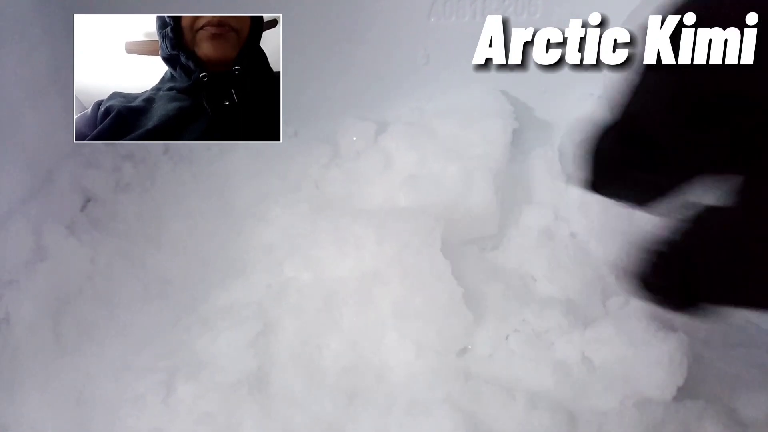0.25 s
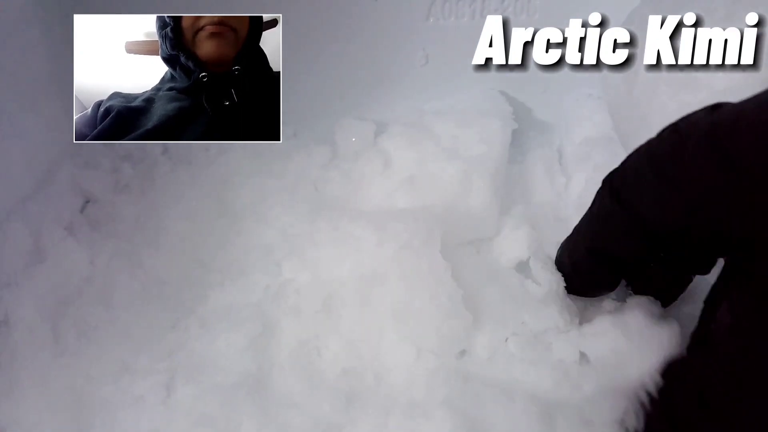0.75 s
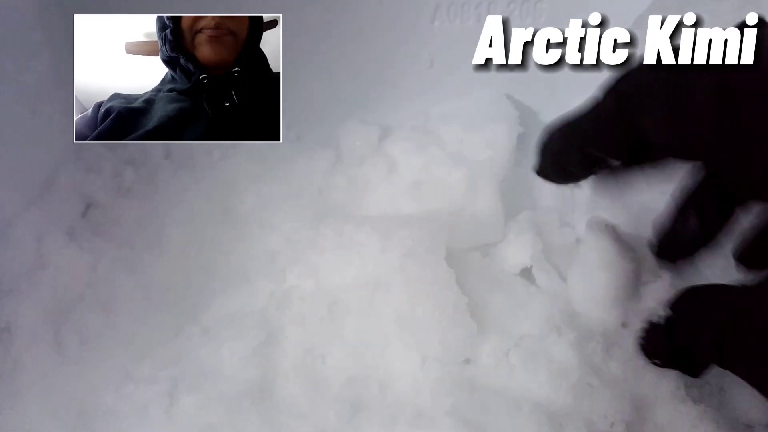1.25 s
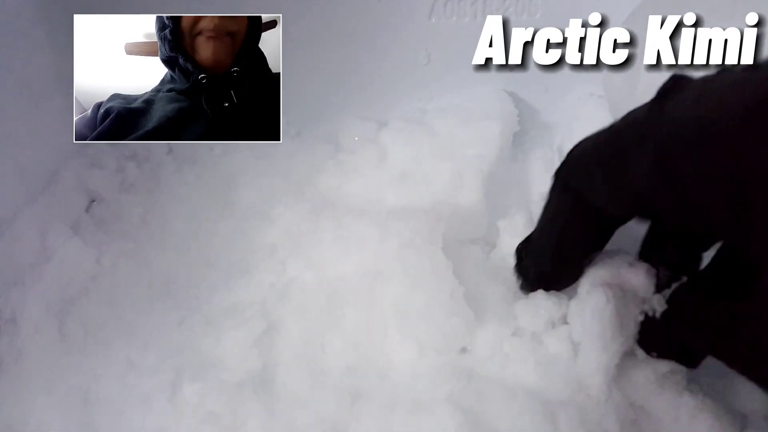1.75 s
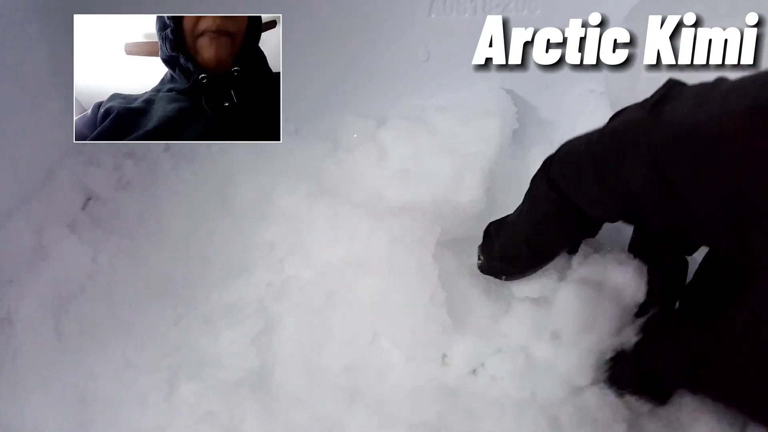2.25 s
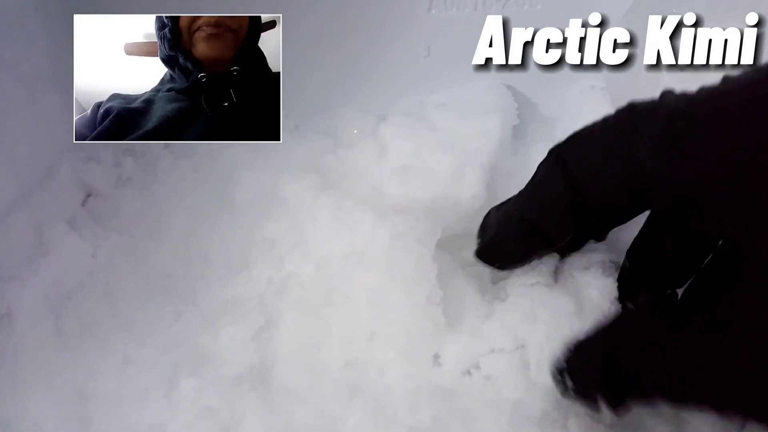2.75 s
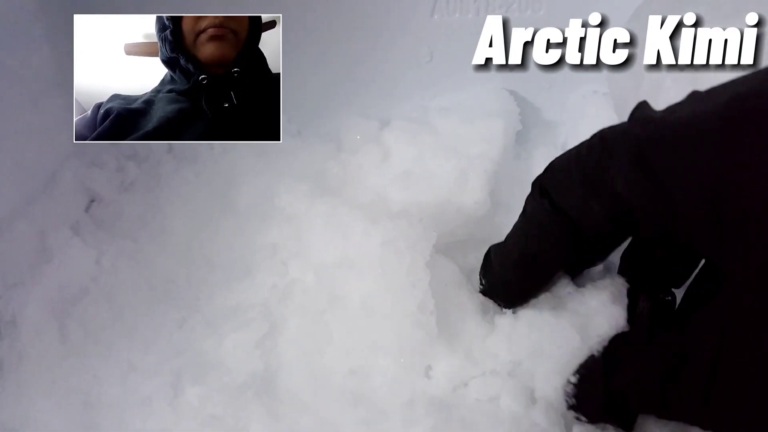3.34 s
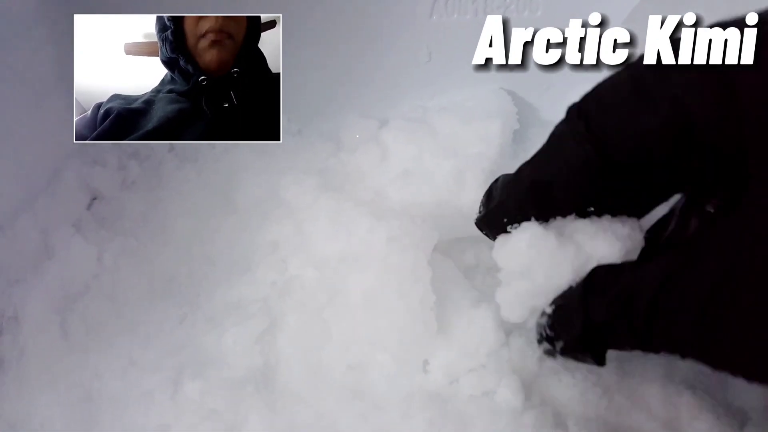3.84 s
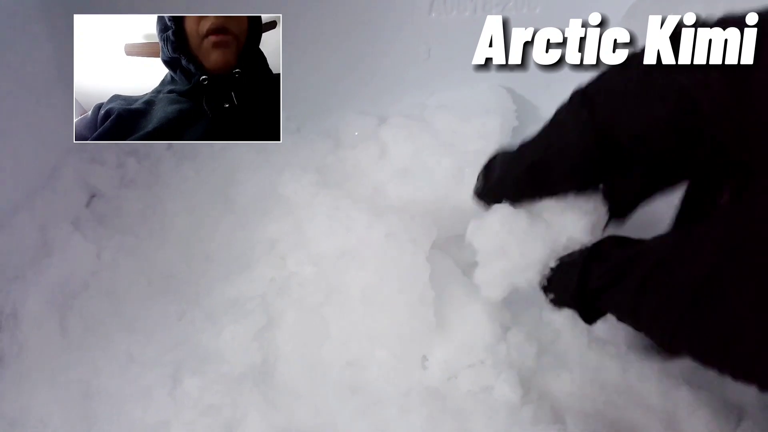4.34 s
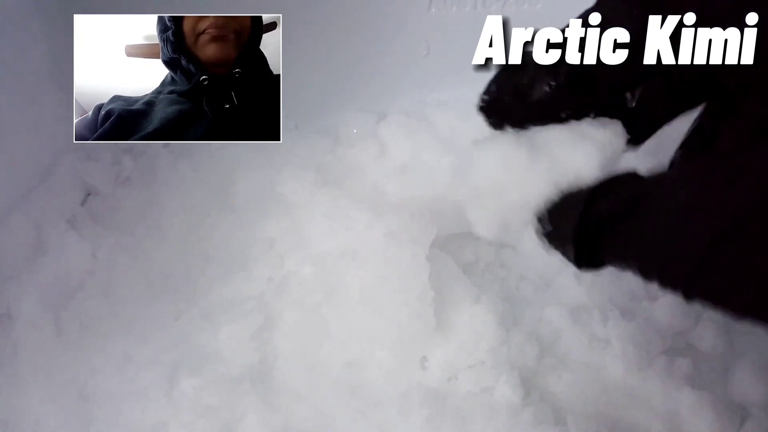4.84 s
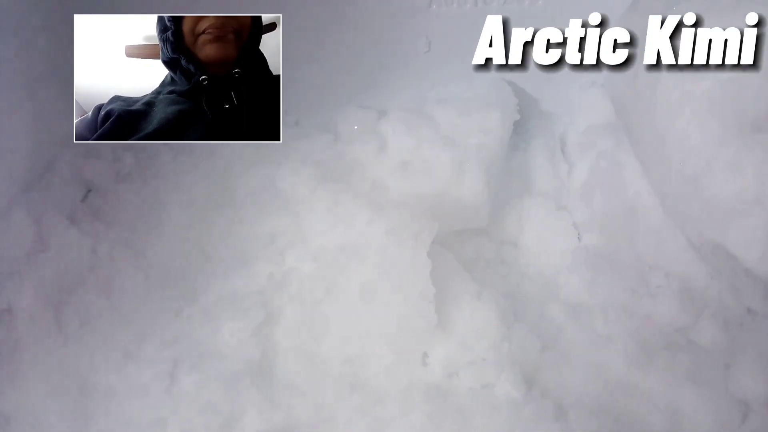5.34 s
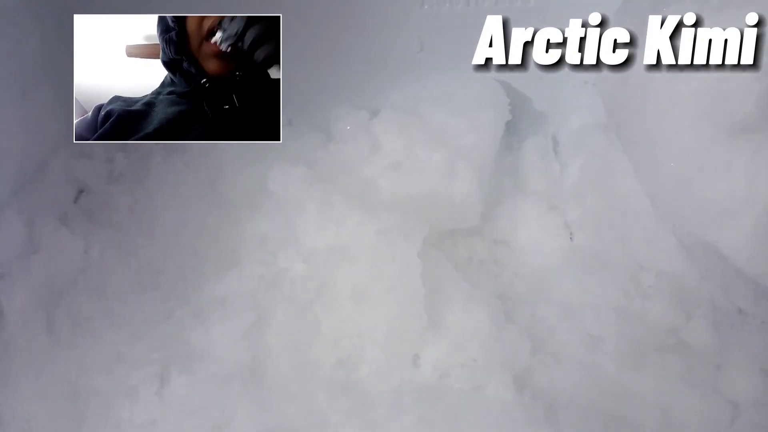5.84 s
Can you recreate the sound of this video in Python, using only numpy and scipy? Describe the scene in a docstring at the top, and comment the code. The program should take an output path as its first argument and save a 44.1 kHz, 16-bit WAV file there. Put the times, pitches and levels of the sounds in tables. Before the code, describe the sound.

A freezer compressor drones steadily, a low hum near 60 Hz with faint higher whine and rushing air, heard from inside the boxy cabinet by a close stereo microphone. A knock opens at 0 s; at about 0.25 s sharp bright snaps and a powder hiss follow, with small squeaky rubs. From 0.5 to 1.2 s gloved fingers rake packed frost in dense crunches with booming thuds. Stronger strokes come around 1.4 and 2.1 s, with crackles and spills between; crisp snaps hit near 2.7 s, and more crunching lasts until 3.7 s. Then only short powdery spills and light crumbs until 4.3 s. Muffled knocks and small cracks cluster at 4.6 s. Around 5.1 to 5.3 s, knocks and a hard crunch lead to a lump tearing free, its tone sliding down into a low thud. A deep bump at 5.6 s and soft knocks with faint rustles near 5.9 s close over the hum.

```python
"""Inside a freezer, gloved fingers rake and scoop powdery frost while the compressor drones.
The drone is a set of sine tones over rushing noise. Random tiny fractures become thuds in the cabinet,
crunch in packed frost and hiss in loose powder. Snaps and rubs are short noise bursts that ring;
knocks are soft pushes on the cabinet, and one torn lump is a falling tone.
A close stereo microphone feeds a limiter, so the drone ducks under loud strokes."""
import sys
import numpy as np
from scipy import signal
from scipy.fft import rfft, irfft
from scipy.io import wavfile
from scipy.ndimage import uniform_filter1d

SR = 44100
rng = np.random.default_rng(int(sys.argv[2]) if len(sys.argv) > 2 else 0)


def pcm_store(signal):
    """Save signal as 16-bit PCM."""
    levels = np.round(np.clip(np.atleast_2d(signal), -1, 1) * 32767)
    wavfile.write(sys.argv[1], SR, levels.astype(np.int16).T)


N = 268569   # length in samples


def from_db(db):
    """Turn decibels into gain."""
    return 10 ** (np.asarray(db) / 20)


def rms_one(x):
    """Scale a sound to an average (rms) level of 1."""
    return x / np.sqrt(np.mean(x ** 2) + 1e-20)


def drift(rate_hz):
    """Random wander of spread 1; a lower rate makes it slower and smoother."""
    r = np.exp(-2 * np.pi * rate_hz / SR)
    noise = rng.standard_normal(N + SR)
    wander = signal.lfilter([1], [1, -2 * r, r * r], noise)
    return rms_one(wander[SR:])   # skip the first second, while the filter settles


def resonate(x, hz, width_hz):
    """Let a sound ring at one pitch (two-pole resonance, gain 1 at its peak)."""
    r = np.exp(-np.pi * width_hz / SR)
    feedback = [1, -2 * r * np.cos(2 * np.pi * hz / SR), r * r]
    return signal.lfilter([(1 - r * r) / 2, 0, (r * r - 1) / 2], feedback, x)


def shape(x, points, to_gain=from_db):
    """Colour a sound with a minimum-phase filter, which never acts before its input arrives."""
    hz, value = np.transpose(points)
    grid_hz = np.fft.rfftfreq(4096, 1 / SR) + 1   # +1 avoids the logarithm of zero
    gain = to_gain(np.interp(np.log(grid_hz), np.log(hz), value))
    # Folding the cepstrum (the spectrum of the log gain) forward in time gives minimum phase.
    cepstrum = irfft(np.log(gain + 1e-6))
    cepstrum[1:2048] *= 2
    cepstrum[2049:] = 0
    response = irfft(np.exp(rfft(cepstrum)))
    return signal.fftconvolve(np.atleast_2d(x), response[None], axes=1)[:, :N]


# How alike left and right are: pitch_hz, likeness (1 = the same, 0 = unrelated)
LEFT_RIGHT_LIKENESS = [(180, 1), (350, 0.97), (600, 0.1), (3000, 0.12), (15000, 0.035)]
# Balance between the sides: pitch_hz, left_over_right_db
SIDE_BALANCE = [(150, 2.5), (900, -0.5), (2500, 4), (5000, 1.5), (8000, 2.5), (15000, 6.5)]


def stereo(common, apart):
    """Mix two unrelated signals so the channels agree in the bass and part in the treble."""
    mid = shape(common, LEFT_RIGHT_LIKENESS, lambda c: np.sqrt(1 + np.clip(c, -.99, .99)))
    side = shape(apart, LEFT_RIGHT_LIKENESS, lambda c: np.sqrt(1 - np.clip(c, -.99, .99)))
    left = shape((mid + side)[0], SIDE_BALANCE, lambda db: from_db(db / 2))
    right = shape((mid - side)[0], SIDE_BALANCE, lambda db: from_db(-db / 2))
    return np.vstack([left, right])


SHAFT_HZ = 58.75   # turns per second
RUSH_DB = -20   # average level, before its slow wander
# Drone tones: multiple of shaft speed, level_db (rms, before panning and wavering)
DRONE_TONES = [(1, -21.5), (2, -32), (3, -28.5), (5, -30), (6, -36.5), (10, -37.5), (13, -26.5), (14, -34),
               (15, -37.5), (17, -40), (36, -44), (48, -42), (49, -37.5), (51, -38), (52, -40)]
# Where each tone sits: pitch_hz, left_over_right_db, left_lead_rad
DRONE_PLACES = [(60, 3.5, 0.29), (790, -2, 0.8), (1120, 26, 2.2), (3000, 1, 0.48)]
# Colour of the machine's broad rush: pitch_hz, level_db (per Hz, relative)
RUSH_COLOUR = [(40, -21), (176, -4.5), (290, -21), (490, -26), (770, -22.5), (2600, -30), (2980, -21.5),
               (3400, -34.5), (6000, -40), (16000, -42)]


def compressor():
    """Shaft multiples form a drone that wavers a little, over a rush of noise."""
    turn = 2 * np.pi * SHAFT_HZ * np.arange(N) / SR
    half = np.array([[.5], [-.5]])   # share the differences between left and right
    place_hz, pans_db, leads_rad = np.transpose(DRONE_PLACES)
    drone = 0
    for multiple, level_db in DRONE_TONES:
        hz = multiple * SHAFT_HZ
        pan_db = np.interp(hz, place_hz, pans_db)
        lead_rad = np.interp(hz, place_hz, leads_rad)
        # Starting points cover only part of a cycle: loosely in step, a throb each turn.
        start_rad = 3.52 * rng.random()
        tone = np.sin(multiple * turn + lead_rad * half + start_rad)
        drone = drone + np.sqrt(2) * from_db(level_db + pan_db * half) * tone
    rush = rms_one(shape(stereo(*rng.standard_normal((2, N))), RUSH_COLOUR))
    wavering_drone = drone * from_db(0.78 * drift(13))
    return wavering_drone + from_db(RUSH_DB + 0.64 * drift(5.3)) * rush


# Booming notes of the freezer's air and walls: pitch_hz, width_hz, level_db (relative)
CABINET_NOTES = [(130.5, 33, -7), (159.3, 21, -1), (191.1, 16, 6.5), (294, 137, -5.5), (376.3, 55, 1.5),
                 (510, 66, -5)]


def cabinet(x):
    """Air and walls of the freezer boom on a few low resonances."""
    boom = 0
    for k, (hz, width_hz, level_db) in enumerate(CABINET_NOTES):
        boom = boom + (-1) ** k * from_db(level_db) * resonate(x, hz, width_hz)   # signs alternate
    return boom


# A lump tearing free: start_s, level_db (once the slide is over), from_hz, to_hz,
# slide_s (time constant), length_s
LUMP_SLUMP = (5.264, 4.9, 1100, 160, 0.029, 0.16)


def slump():
    """A torn lump's tone slides down to a low note, ragged and weak during the slide."""
    start_s, level_db, from_hz, to_hz, slide_s, length_s = LUMP_SLUMP
    t = np.maximum(np.arange(N) / SR - start_s, 0)
    sliding = np.exp(-t / slide_s)
    pitch_hz = to_hz + (from_hz - to_hz) * sliding
    tone = np.sin(2 * np.pi * np.cumsum(pitch_hz) / SR)
    ragged_db = (9.9 * drift(150) - 15.0) * sliding
    swell = np.sin(np.pi * np.minimum(t / length_s, 1)) ** 0.42
    return from_db(level_db + ragged_db) * tone * swell


# Knuckles and lumps knocking the cabinet: start_s, push_db (before filtering),
# top_hz (upper edge of the octave that is pushed)
CABINET_KNOCKS = [(.008, 46, 468), (4.59, 37.5, 290), (4.619, 47, 700), (4.632, 38, 660),
                  (4.654, 43.5, 596), (4.69, 40, 650), (5.127, 38, 605), (5.203, 43, 606),
                  (5.219, 51.5, 300), (5.568, 57, 180), (5.897, 44.5, 218), (5.955, 42.5, 220)]


def knocks():
    """A soft push excites the cabinet; a padded contact reaches only its lowest notes."""
    pushes = np.zeros(N)
    click = np.eye(1, 2000)[0]   # a single 1, then silence
    for start_s, push_db, top_hz in CABINET_KNOCKS:
        octave = signal.butter(2, [top_hz / 2, top_hz], "band", fs=SR, output="sos")
        start = round(start_s * SR)
        pushes[start:start + 2000] += from_db(push_db) * signal.sosfilt(octave, click)
    boom = cabinet(pushes + 1e-18)   # a tiny offset avoids slow near-zero arithmetic
    return (boom + 0.084 * pushes) * from_db([[1.1], [-1.1]])   # a little to the left


RUB_WIDTH = 0.18   # width of each main resonance as a share of its pitch
RUB_STUTTER_DB = 1.8   # unevenness of the grip
# Short rubs and squeaks: start_s, length_s, level_db (rms, before the fade), pitch_hz
FROST_RUBS = [(0.268, 0.0084, 0, 4630), (0.319, 0.26, -16.5, 1310), (0.438, 0.088, -7, 1245),
              (1.111, 0.093, -13.5, 2950), (1.352, 0.036, -9.5, 3200), (2.737, 0.018, -3, 5150),
              (0.443, 0.036, -12, 2730), (0.444, 0.026, -10, 910), (4.313, 0.022, -15.5, 3670),
              (2.89, 0.086, -34, 1280), (5.2, 0.048, -9.5, 1310), (5.724, 0.022, -15.5, 776),
              (5.98, 0.2, -17, 1240)]


def rubs():
    """Friction noise rings narrowly at one pitch, with a quick start and a fading end."""
    out = np.zeros((2, N))
    friction = rng.standard_normal(N) + .5 * rng.standard_normal((2, N))
    friction = friction * from_db(RUB_STUTTER_DB * drift(39))
    for start_s, length_s, level_db, hz in FROST_RUBS:
        span = slice(round(start_s * SR), round((start_s + length_s) * SR))
        noise = friction[:, span]
        # Two passes through one resonance make steep sides; a wider one adds some breath.
        narrow = resonate(resonate(noise, hz, RUB_WIDTH * hz), hz, RUB_WIDTH * hz)
        ring = rms_one(narrow + 0.099 * resonate(noise, hz, hz))
        fade = np.interp(np.linspace(0, 1, ring.shape[1]), [0, .18, .85, 1], [0, 1, .6, 0])
        out[:, span] += from_db(level_db) * ring * fade
    return out


# Single crystals breaking: start_s, peak_db (before panning), pitch_hz
CRYSTAL_SNAPS = [(0.2532, 10.5, 13500), (0.27, 12, 4530), (0.3392, 8, 2450), (0.672, 8, 13800),
                 (1.002, 6, 12300), (1.251, 8.5, 12330), (1.562, 6, 3000), (2.7314, 12, 12600),
                 (2.77, 3, 3600), (2.8525, 7, 4270), (4.047, -6.5, 2600), (4.615, -1, 1050),
                 (4.633, 3.5, 1140), (4.692, 0, 1120), (4.694, -4.5, 3000), (4.78, -4.5, 5050),
                 (5.4783, 0.5, 5450), (5.777, 2.5, 3000), (6.076, -5.5, 4150)]


def snaps():
    """Each snap is a few milliseconds of splinters ringing at its own pitch, nearer the left."""
    out = np.zeros((2, N))
    fade = np.exp(-np.arange(400) / SR / 0.002)   # 2 ms time constant
    pan_db = 1.5 * np.array([[1], [-1]])
    bursts = rng.standard_normal((len(CRYSTAL_SNAPS), 2, 400))
    for (start_s, peak_db, hz), burst in zip(CRYSTAL_SNAPS, bursts):
        splinters = burst * fade
        ring = resonate(resonate(splinters, hz, 0.48 * hz), hz, 0.48 * hz)
        ring = ring + 0.016 * np.diff(splinters, prepend=0)   # a trace of bright edge
        start = round(start_s * SR)
        out[:, start:start + 400] += from_db(peak_db + pan_db) * ring / abs(ring).max()
    return out


def crystals(per_s, spread_db, clump_db, clump_rate):
    """Dense random fractures of uneven size come in clumps, spread over left and right."""
    clumps = from_db(clump_db * drift(clump_rate))
    sizes = from_db(spread_db * np.minimum(rng.exponential(1, (2, N)), 5))
    sizes = sizes * rng.standard_normal((2, N))
    breaks = rng.random((2, N)) < per_s / SR
    return stereo(*(sizes * breaks * clumps))


def crumbs(x, edges_hz, patchy_db, rate):
    """Crumbs of different size break independently, so each band flickers on its own."""
    lows = [0]
    for hz in edges_hz:
        lows.append(signal.sosfilt(signal.butter(2, hz, fs=SR, output="sos"), x))
    lows.append(x)
    # The difference between neighbouring low-pass outputs is one band.
    return sum((upper - lower) * from_db(patchy_db * drift(rate)) for lower, upper in zip(lows, lows[1:]))


LUMPS_PER_S, LUMP_CYCLES = 900, 21.4   # rate of cracks; more cycles give a longer ring


def lumps():
    """Sparser cracks of caked frost each ring briefly at a pitch and place of their own."""
    cracks = from_db(2.38 * np.minimum(rng.exponential(1, N), 4)) * (rng.random(N) < LUMPS_PER_S / SR)
    pan_db = rng.normal(3.1, 9.2, N) * np.array([[.5], [-.5]])
    cracks = cracks * from_db(pan_db)
    pitches_hz = np.geomspace(420, 4200, 16)
    dealt = rng.integers(0, 16, N)   # which pitch each crack gets
    return sum(resonate(cracks * (dealt == k) + 1e-18, hz, 2.02 * hz / LUMP_CYCLES)
               for k, hz in enumerate(pitches_hz))


LUMP_DB = 1   # lumps against crumbs
# Colour of packed frost: pitch_hz, level_db (per Hz, relative)
CRUNCH_COLOUR = [(300, -17.5), (520, 0.5), (800, -4), (980, -5), (1320, -5.5), (1500, -11), (2600, -13),
                 (3000, -13.5), (3500, -17), (8000, -39)]


def packed_frost(coarse):
    """Coarse fractures flicker in bands as crumbs, joined by ringing lumps."""
    crumbling = crumbs(shape(coarse, CRUNCH_COLOUR), np.geomspace(600, 4500, 8), patchy_db=3.5, rate=18.5)
    caked = rms_one(shape(lumps(), CRUNCH_COLOUR))
    return rms_one(rms_one(crumbling) + from_db(LUMP_DB) * caked)


# Colour of loose powder and stray grains: pitch_hz, level_db (per Hz, relative)
POWDER_COLOUR = [(2000, -7), (3300, -5), (4600, -4.5), (7000, -11.5), (10000, -8), (13000, -7),
                 (16000, -25)]


def loose_powder(fine, coarse):
    """Fine fractures with some coarse ones hiss in flickering treble bands."""
    hiss = shape(fine + 0.23 * coarse, POWDER_COLOUR)
    return rms_one(crumbs(hiss, np.geomspace(4000, 13000, 5), patchy_db=2.5, rate=11.4))


def stray_grains():
    """Sparse little fractures tick quietly as stray grains rattle down."""
    ticks = shape(crystals(46, spread_db=4.0, clump_db=-1.5, clump_rate=2), POWDER_COLOUR)
    return from_db(-36.5) * rms_one(ticks)


def gestures(rows, levels_db, attack_s, release_s, sag_db):
    """Power over time: each gesture rises, sags and falls; overlapping ones add."""
    t, power = np.arange(N) / SR, np.zeros(N)
    for (start_s, length_s, *_), level_db in zip(rows, levels_db):
        span = slice(round(start_s * SR), round((start_s + length_s + release_s) * SR))
        rise_s = min(attack_s, length_s / 2)
        corners_s = [0, rise_s, length_s, length_s + release_s]
        gain = np.interp(t[span] - start_s, corners_s, [0, 1, from_db(sag_db), 0])
        power[span] += (from_db(level_db) * gain) ** 2
    return power


RAKE_ATTACK_S, RAKE_RELEASE_S, RAKE_SAG_DB = 0.047, 0.044, -3   # a drag bites, sags and lets go
THUD_RELEASE_S = 0.068   # the cabinet is let go more slowly
SPILL_ATTACK_S, SPILL_RELEASE_S, SPILL_SAG_DB = 0.017, 0.0089, -1.5
SPILL_CRUNCH_DB = -8   # a spill also stirs some coarser crumbs
REST_THUD_DB, REST_CRUNCH_DB, REST_HISS_DB = -23.5, -27.5, -32   # settling frost, always present
# Fingers dragging through packed frost: start_s, length_s, crunch_db,
# thud_above_crunch_db, powder_above_crunch_db
FROST_RAKES = [(0, 0.019, -10.5, 5, -17), (0.515, 0.098, -8.5, -1, -1), (0.576, 0.078, -4, 8.5, -5.5),
               (0.653, .32, -5.5, 3.5, -4), (0.987, 0.2, -8, 6, -7), (1.229, 0.14, -15, 5.5, 0.5),
               (1.385, 0.12, -0.5, 2, -9.5), (1.528, 0.27, -7.5, 4, -8.5), (1.894, 0.099, -10, 3.5, -7),
               (2.038, 0.028, -9.5, -0.5, -9), (2.08, 0.19, -1.5, 2, -7), (2.293, 0.16, -8, 5.5, -6.5),
               (2.534, 0.072, -13, 4.5, -4), (2.609, 0.067, -6, 0, -16), (2.826, 0.26, -7.5, 3.5, -5.5),
               (3.148, 0.26, -5.5, 2, -9), (3.44, 0.27, -15.5, 6, -4.5), (4.297, 0.074, -20.5, 1, -14),
               (4.54, 0.047, -14, -1, -8), (4.598, 0.084, -14, 4, -25), (5.101, 0.078, -15.5, 6.5, -34),
               (5.19, 0.042, -10, 4, -1), (5.255, 0.038, -3, 0.5, -8)]
# Loose powder brushed aside or spilling: start_s, length_s, hiss_db
POWDER_SPILLS = [(0.243, 0.031, -5), (0.41, 0.076, -17), (0.495, 0.019, -10), (0.558, 0.041, -6),
                 (1.126, 0.01, -8), (1.352, 0.014, -17), (1.585, 0.015, -9.5), (1.621, 0.036, -15),
                 (1.92, 0.0066, -7), (1.968, 0.031, -14), (2.08, 0.11, -23), (2.618, 0.045, -10),
                 (2.719, 0.035, -9), (3.48, 0.0054, -4), (3.51, 0.0074, -7.5), (3.561, 0.038, -10.5),
                 (3.667, 0.03, -5.5), (3.715, 0.048, -13), (3.893, 0.053, -10), (4.094, 0.084, -14.5),
                 (4.284, 0.043, -14.5), (4.596, 0.05, -16), (5.193, 0.018, -12), (5.301, 0.0039, -3),
                 (5.428, 0.098, -24.5), (5.742, 0.082, -19.5), (5.96, 0.12, -19.5)]


def hand():
    """Coarse fractures shake cabinet, packed frost and powder; finer ones add to the powder."""
    _, _, rake_db, thud_db, powder_db = np.transpose(FROST_RAKES)
    spill_db = np.transpose(POWDER_SPILLS)[2]
    spill = gestures(POWDER_SPILLS, spill_db, SPILL_ATTACK_S, SPILL_RELEASE_S, SPILL_SAG_DB)

    def raked(levels_db, release_s):
        """Power of all the drags."""
        return gestures(FROST_RAKES, levels_db, RAKE_ATTACK_S, release_s, RAKE_SAG_DB)

    # Doubling the decibels turns gain into power; the square root turns power back into gain.
    thud_power = raked(rake_db + thud_db, THUD_RELEASE_S) + from_db(2 * REST_THUD_DB)
    crunch_power = raked(rake_db, RAKE_RELEASE_S) + from_db(2 * SPILL_CRUNCH_DB) * spill
    crunch_power = crunch_power + from_db(2 * REST_CRUNCH_DB)
    hiss_power = raked(rake_db + powder_db, RAKE_RELEASE_S) + spill + from_db(2 * REST_HISS_DB)
    coarse = crystals(5000, spread_db=1.23, clump_db=0.5, clump_rate=22.5)
    fine = crystals(15000, spread_db=2.0, clump_db=2.0, clump_rate=89)
    thud = np.sqrt(thud_power) * rms_one(cabinet(coarse))
    crunch = np.sqrt(crunch_power) * packed_frost(coarse)
    hiss = np.sqrt(hiss_power) * loose_powder(fine, coarse)
    return stray_grains() + thud + crunch + hiss


def scene():
    """Add the compressor and every frost sound at the microphone."""
    return compressor() + slump() + knocks() + rubs() + snaps() + hand()


CEILING_DB, RELEASE_DB_S, ATTACK_S = 1, 51.5, 0.0037   # limiter, relative to full scale
OFFSET = -0.022   # steady voltage of the converter, as a share of full scale
CUTOFF_HZ = 16000   # top of the treble


def record(dry):
    """A look-ahead limiter turns both channels down together, before hard clipping and a treble cut."""
    peak_db = 20 * np.log10(abs(dry).max(axis=0) + 1e-9)
    over_db = np.maximum(peak_db - CEILING_DB, 0)
    fall_db = RELEASE_DB_S * np.arange(N) / SR
    held_db = np.maximum.accumulate(over_db + fall_db) - fall_db   # steady release
    # Averaging over the coming moments makes the gain start to fall before a peak.
    ahead = max(round(ATTACK_S * SR), 1)
    padded_db = np.pad(held_db, (0, ahead), "edge")
    reduction_db = uniform_filter1d(padded_db, size=ahead)[ahead // 2:][:N]
    clipped = np.clip(dry * from_db(-reduction_db) + OFFSET, -1, 1)
    top_cut = signal.ellip(8, .5, 70, CUTOFF_HZ, fs=SR, output="sos")
    return signal.sosfilt(top_cut, clipped)


dry = scene()
out = record(dry)
pcm_store(out)
```